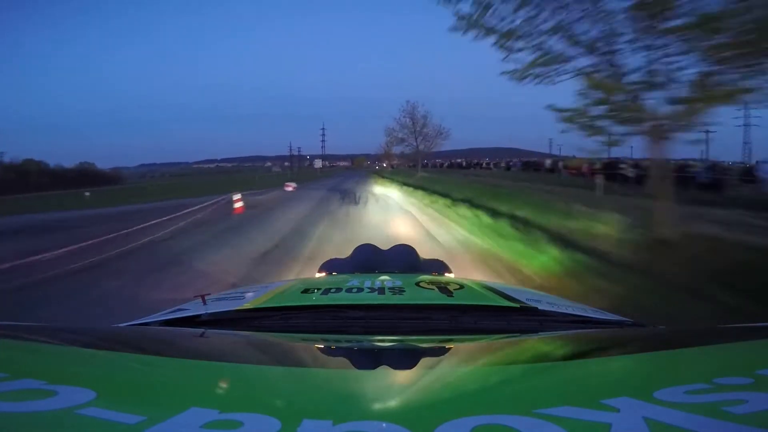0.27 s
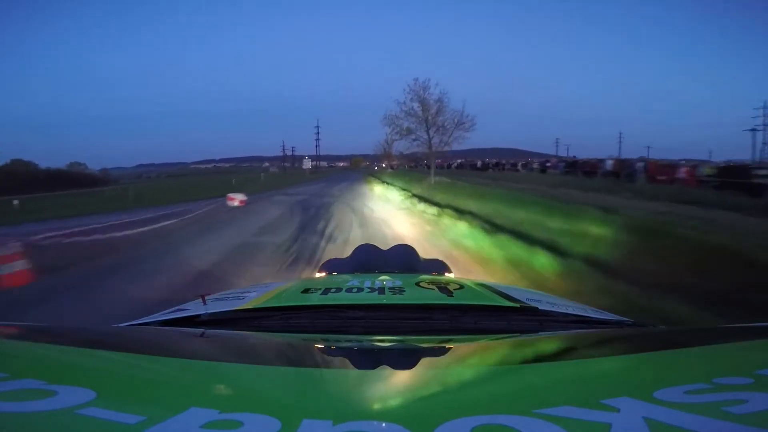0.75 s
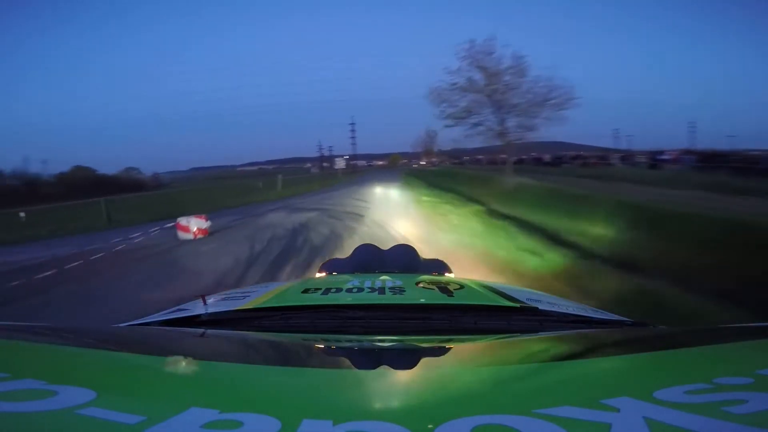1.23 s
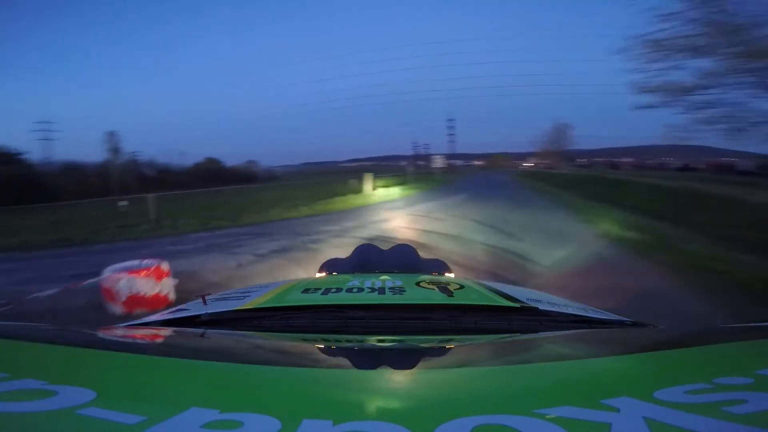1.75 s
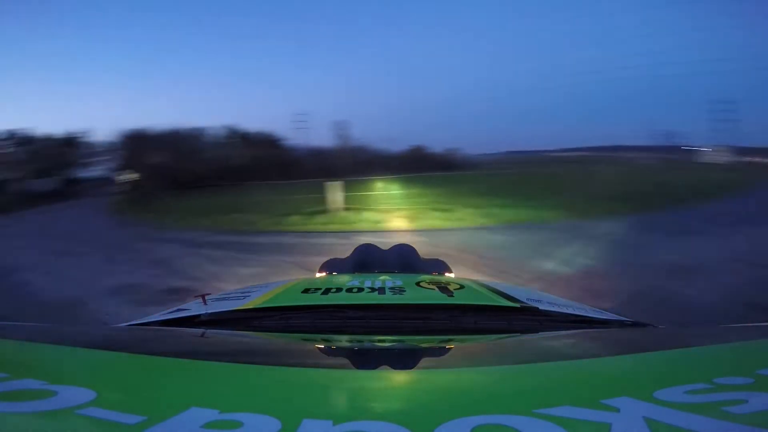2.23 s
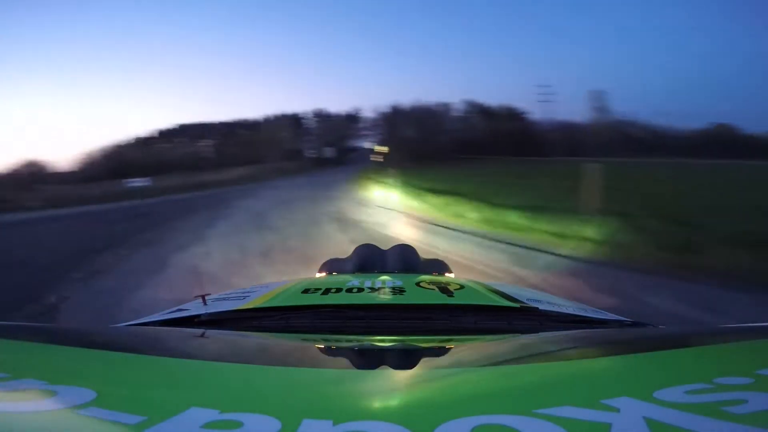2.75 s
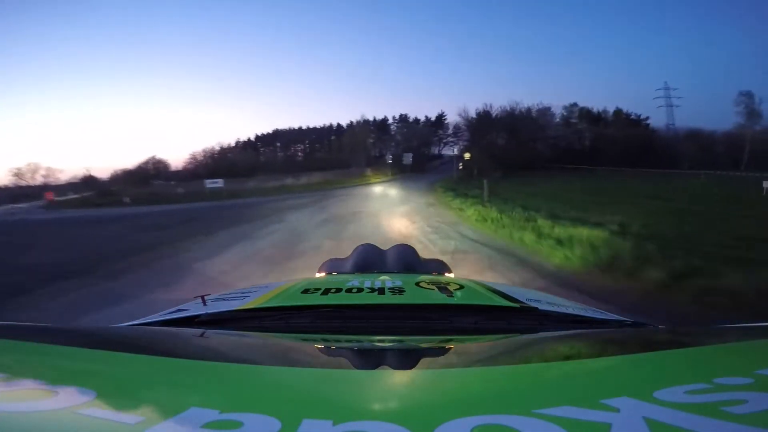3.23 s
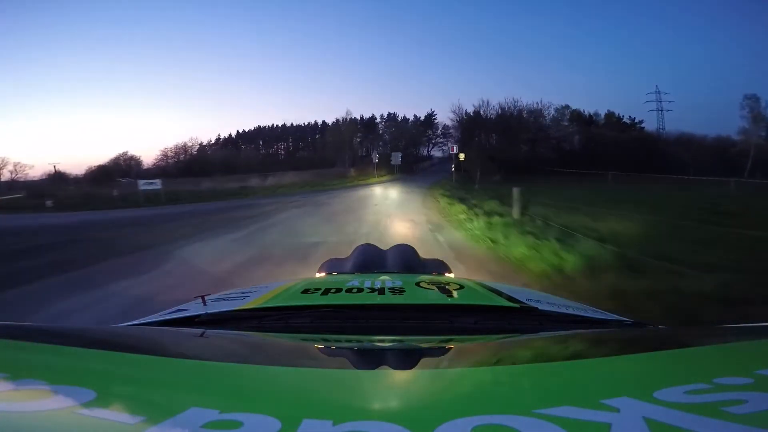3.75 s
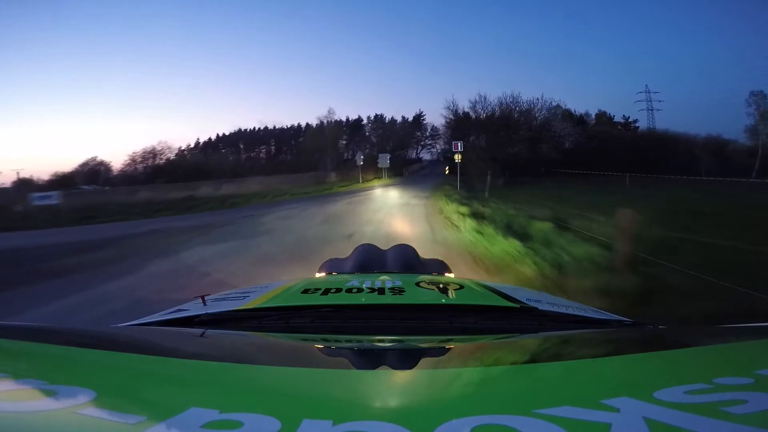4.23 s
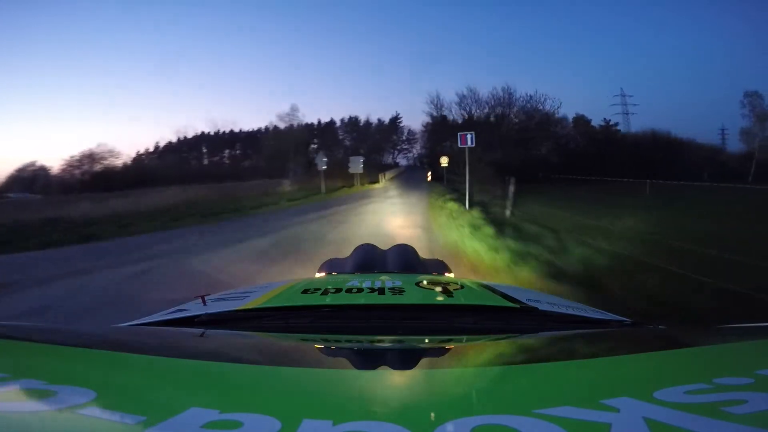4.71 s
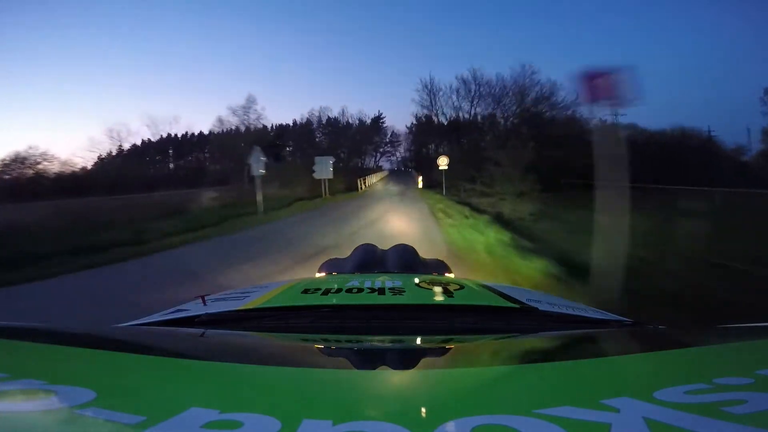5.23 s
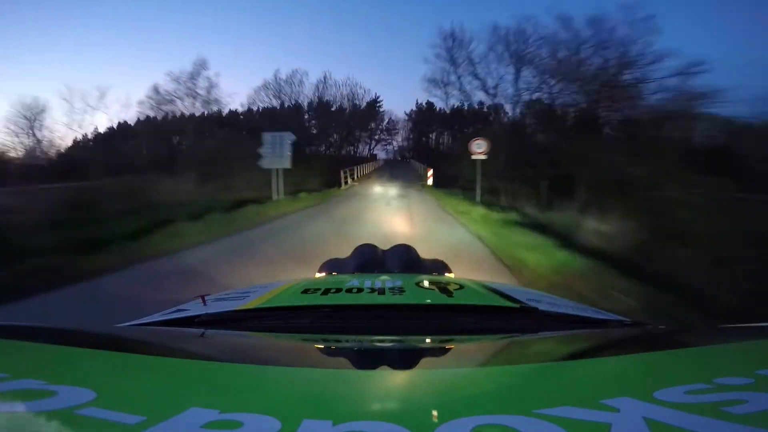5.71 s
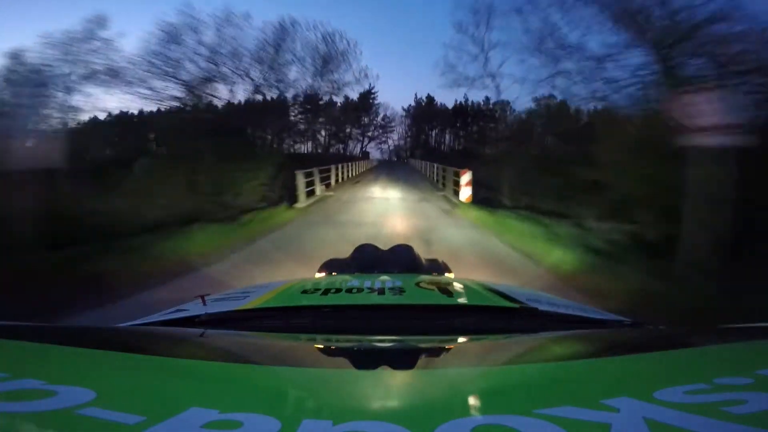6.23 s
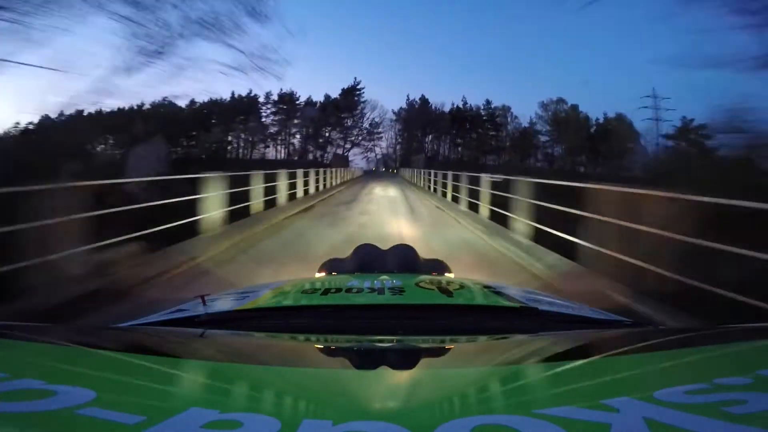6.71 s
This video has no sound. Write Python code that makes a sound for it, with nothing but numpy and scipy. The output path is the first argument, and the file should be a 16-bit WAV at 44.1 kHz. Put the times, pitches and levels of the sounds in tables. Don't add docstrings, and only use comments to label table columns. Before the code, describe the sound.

Rooftop view of a rally car: booming diesel drone sinks through a corner, rattles, climbs again, then the exhaust bangs before the next gear pulls in rushing wind.

```python
import sys
import numpy as np
from scipy import signal
from scipy.fft import rfft, irfft
from scipy.io import wavfile
from scipy.ndimage import uniform_filter1d

SR = 44100
rng = np.random.default_rng(int(sys.argv[2]) if len(sys.argv) > 2 else 0)


def inscribe(sig):
    pcm = np.round(np.clip(np.atleast_2d(sig).T, -1, 1) * 32767)
    wavfile.write(sys.argv[1], SR, pcm.astype(np.int16))


def rack_gain(trim_db):
    fader = np.asarray(trim_db, float)
    return 10 ** (fader / 20)


N = 306936


def evened(x):
    return x / np.sqrt(np.mean(x ** 2) + 1e-20)


def add(mix, start_s, sound):
    part = mix[round(start_s * SR):][:len(sound)]
    part += sound[:len(part)]


def columns(rows):
    s, *cols = np.transpose(rows)
    t = np.arange(s[0], s[-1], 1 / SR)
    return t, [np.interp(t, s, c) for c in cols]


def along(rows):
    s, *cols = np.transpose(rows)
    return [np.interp(np.arange(N) / SR, s, c) for c in cols]


def tent(t, peak_s, rise_s, fall_s):
    return np.interp(t, [peak_s - rise_s, peak_s, peak_s + fall_s], [0, 1, 0])


def tents(t, rows):
    return sum(height * tent(t, s, half_s, half_s) for s, height, half_s in rows)


def puff_db(t, rise_s, fall_s):
    return -20 * np.where(t < 0, -t / rise_s, t / fall_s)


def swells(rows):
    s, db, rise_s, fall_s = np.transpose(rows)[:4, :, None]
    grid = np.arange(0, N + 32, 32)
    power = rack_gain(2 * (db + puff_db(grid / SR - s, rise_s, fall_s))).sum(0)
    return np.interp(np.arange(N), grid, power)


def coloured(x, points):
    f, db = np.transpose(points)
    hz = np.fft.rfftfreq(len(x), 1 / SR)
    curve_db = np.interp(np.log(hz + 1), np.log(f), db, -90, -90)
    return irfft(rfft(x) * rack_gain(curve_db), len(x))


def drift(hz):
    z = rfft(rng.standard_normal(N))
    return evened(irfft(z / (1 + (np.fft.rfftfreq(N, 1 / SR) / hz) ** 4), N))


def ring(x, modes):
    out = np.zeros(len(x))
    for k, (hz, width_hz, db) in enumerate(modes):
        pole = np.exp((2j * np.pi * hz - np.pi * 1.5 * width_hz) / SR)
        rung = signal.lfilter([(1 - abs(pole)) ** 2], np.poly([pole, pole]), x).real
        out += (-1) ** k * rack_gain(db) * rung
    return out


def lowpass(x, edge_hz):
    return signal.sosfilt(signal.butter(2, edge_hz, fs=SR, output="sos"), x)


# time_s, firing_hz, load_db (level of the firing tone)
GEARS = [
    [(0.0, 123.1, -14.5), (0.4, 117.9, -12), (0.77, 103.8, -9), (0.95, 94.89, -15.5), (1.17, 84.1, -16.5),
     (1.57, 74.68, -17), (1.78, 66.5, -12.5), (2.02, 58.07, -17), (2.19, 54.65, -14.5),
     (3.08, 52.33, -18.5), (3.38, 59.02, -19.5), (4.21, 80.53, -14), (4.59, 99.3, -9.5),
     (4.69, 108.8, -9.5), (4.87, 137.7, -29.5), (5.08, 161.4, -23.5), (5.24, 176, -19), (5.7, 163.5, -49)],
    [(6.3, 101.4, -39), (6.43, 107.2, -11.5), (6.53, 114, -19.5), (6.7, 119, -15), (6.959, 128, -16.5)],
]
# peak_s, extra_hz, rise_s, fall_s
FLARES = [
    (2.35, 15, 0.17, 0.13),
    (2.611, 5.5, 0.12, 0.18),
    (2.95, 7, 0.21, 0.091),
]
# peak_s, load_change_db, half_s
SLACKS = [(0.838, -10, 0.064), (0.905, -18, 0.031), (0.989, -19, 0.029), (1.678, -11.5, 0.086),
          (1.812, -16, 0.04), (2.028, -0.5, 0.1), (2.486, 2, 0.017), (4.263, -4.5, 0.067),
          (5.148, -15, 0.037), (6.44, -16, 0.021), (1.3, -1, 0.046), (1.447, -8, 0.058), (2.42, -5, 0.055),
          (2.928, -5, 0.069), (2.62, -4, 0.061)]
OVERTONES = (2, 2.5, 3, 3.5, 4, 5)
# level_db, brightening_db_per_octave of revs
OVERTONE_SHAPE = [(0.5, -1), (-16, 7.5), (-7.5, 4), (-10, 6), (-16, 3.5), (-17, 4.5)]
# freq_hz, gain_db
THROUGH_ROOF = [(100, 4), (115, -2), (135, -11), (150, -24), (174, -13.5), (195, -29.5), (240, -35),
                (290, -23), (355, -20), (420, -20), (490, -14), (600, -34.5), (900, -21)]
# peak_s, change_db, half_s
BEATS = [(1.8, -12, 0.026), (1.9, -23, 0.027), (2.105, 2, 0.091), (2.158, -26, 0.032), (2.167, 2, 0.04),
         (2.372, -1, 0.03), (2.455, -26, 0.054), (2.51, 7, 0.063), (2.634, -7.5, 0.055), (2.69, 5.5, .04),
         (2.818, 6.5, 0.068), (2.86, -13, 0.024), (2.95, -4, .1), (3.078, 7, .05), (3.132, 0, .05),
         (3.219, 8.5, 0.062), (3.276, 2.5, 0.027), (3.348, 6, 0.072), (3.402, -3, .03)]
# peak_s, change_db, half_s
THIRD_SWELLS = [(2.003, 13, .12), (2.25, -5, .1), (2.5, 9, 0.091), (2.641, 4, .12), (2.87, -3, 0.11),
                (2.96, -7, .06), (3.03, 7, .06), (3.2, 7, .07), (3.382, 9, .1)]


def engine():
    gear_overtone_db = (0.37, -8)
    overtone_db, load_share, rev_db_per_octave = -15.5, 0.31, 3
    sway_depth_db, slip_rad = 5.5, 0.09
    out, firing_hz = np.zeros(N), np.full(N, 112.)
    wobble, flutter = drift(29), drift(8.3)
    for rows, gear_db in zip(GEARS, gear_overtone_db):
        t, (hz, load_db) = columns(rows)
        hz = hz + sum(extra_hz * tent(t, s, rise_s, fall_s) for s, extra_hz, rise_s, fall_s in FLARES)
        over_db = overtone_db + gear_db + load_share * (load_db + 14.5)
        over_db = over_db + rev_db_per_octave * np.log2(hz / 90)
        phase = 2 * np.pi * np.cumsum(hz) / SR
        uneven = flutter[round(t[0] * SR):][:len(t)]
        tone = rack_gain(load_db + tents(t, SLACKS)) * np.sin(phase)
        beat_db, third_db = tents(t, BEATS), tents(t, THIRD_SWELLS)
        for k, (db, bright_db) in zip(OVERTONES, OVERTONE_SHAPE):
            roof_db = np.interp(k * hz, *np.transpose(THROUGH_ROOF)) + bright_db * np.log2(hz / 70)
            sway_db = sway_depth_db * np.tanh(drift(7.8)[:len(t)])
            roof_db += beat_db if k == 2 else sway_db / 2 + third_db * (k == 3)
            level = rack_gain(over_db + db + roof_db + 1.9 * uneven)
            tone += level * np.sin(k * (phase + slip_rad * uneven) + k)
        add(out, t[0], np.sqrt(2) * tone)
        add(firing_hz, t[0], hz - firing_hz[-1])
    return out * rack_gain(0.74 * wobble), np.cumsum(firing_hz) / SR


# time_s, judder_hz, level_db
JUDDER = [(3.45, 126.7, -10), (3.522, 129.8, -38), (3.544, 131.9, -16), (3.614, 137.6, -24),
          (3.646, 140.2, -18), (3.8, 130.7, -20.5), (3.88, 134.2, -17), (4.13, 131.4, -17.5),
          (4.2, 127.6, -16.5), (4.3, 128.7, -22.5), (4.45, 125.8, -16)]


def judder():
    t, (hz, db) = columns(JUDDER)
    phase, out = 2 * np.pi * np.cumsum(hz) / SR, np.zeros(N)
    tone = np.sin(phase) + rack_gain(-19.5) * np.sin(phase * 3 / 2)
    level = rack_gain(db + 2.6 * drift(22)[:len(t)]) * signal.windows.tukey(len(t), .15)
    add(out, t[0], np.sqrt(2) * level * tone)
    return out


# start_s, crack_db, thump_db, thump_hz
BANGS = [(5.286, -24, -28, 102), (5.298, -8, -3, 112.6), (5.323, -6, 4.5, 109.2), (5.349, 5.5, -15, 106),
         (5.363, -8, -19, 100), (5.382, -16, 6.5, 102.4), (5.405, -13.5, -25, 106.1),
         (5.44, -10, -5.5, 102), (5.534, -46, 1, 103.8), (5.751, -9.5, 6.5, 102.8), (5.846, -2, 3, 96.3),
         (5.863, -7, -27, 105), (5.878, -21, -14, 102.3), (5.913, -3.5, 2, 102.4), (5.943, -7.5, -52, 98.6),
         (5.985, -12, -30, 98.7), (5.992, -12.5, 2, 92.4), (6.019, -20, -36, 97.7),
         (6.058, -5, -3.5, 109.7), (6.087, -7.5, -9, 99), (6.123, -11.5, 1, 103.4),
         (6.145, -17, -18, 106.3), (6.169, -21, -13, 97), (6.199, -21, 1.5, 95.4),
         (6.264, -14, -0.5, 101.5), (6.338, -8.5, 2.5, 100.7), (6.398, -15, -0.5, 94),
         (5.37, -12, -28, 102)]
# freq_hz, width_hz, level_db
CRACK_MODES = [(340, 167, 9.5), (600, 220, 7.5), (910, 730, 3), (1900, 120, -35)]
# start_s, level_db
TICKS = [(3.497, -35), (5.349, -18), (5.384, -28), (5.4041, -30), (5.4385, -19), (5.7488, -24),
         (5.8446, -23), (5.8526, -25), (5.88, -21), (5.916, -27), (5.947, -23), (5.989, -22), (6.023, -28),
         (6.06, -19), (6.0902, -17), (6.125, -29), (6.1449, -29), (6.1695, -36), (6.1994, -34), (6.34, -20),
         (6.4014, -35)]


def bangs():
    tick_modes = [(2610, 700, 5.5), (4200, 1200, -20), (7000, 1300, -25), (11000, 1500, -32)]
    tick_db = -0.5
    out, t = np.zeros(N), np.arange(12000) / SR
    noise = rng.standard_normal((len(BANGS), 2, len(t)))
    for (s, crack_db, thump_db, hz), (dull, sharp) in zip(BANGS, noise):
        blow = t * np.exp(-t / 0.00013) / .0001 * (1 + 0.29 * dull)
        echo_s = 0.00398 + 0.00066 * dull[0]
        echo = np.roll(blow, round(echo_s * SR))
        scatter = (0.21 * np.exp(-t / 0.012) + 0.04 * np.exp(-t / 0.017)) * sharp
        crack = ring(blow - .5 * echo + scatter, CRACK_MODES)
        fade = rack_gain(thump_db - 5.5 - 60 * t / 0.25) + rack_gain(crack_db - 60 * t / 0.075)
        thump = -np.sin(2 * np.pi * hz * t) * (1 - np.exp(-t / 0.0052)) * fade
        add(out, s + .001, rack_gain(crack_db - 1.5) * crack / abs(crack).max())
        add(out, s, thump * np.cos(np.pi / 2 * t / t[-1]))
    for (s, db), sharp in zip(TICKS, rng.standard_normal((len(TICKS), len(t)))):
        edge = np.exp(-t / .00004) + .25 * sharp * np.exp(-t / .002)
        tick = ring(edge, tick_modes)
        add(out, s, rack_gain(tick_db + db) * tick / abs(tick).max())
    return lowpass(out, 14000)


def clatter():
    knocks_per_s, level_db = 160, -30.5
    span_s = (5.2, 5.349, 5.501, 5.75, 5.9, 6.451)
    modes = [(420, 250, 1), (800, 500, 0), (1500, 1100, -8.5), (2600, 900, -12.5)]
    chance, size = rng.random(N), np.minimum(rng.exponential(1, N), 4)
    knocks = (chance < knocks_per_s / SR) * rack_gain(7.2 * size)
    decay = np.exp(-np.arange(1500) / SR / 0.0035)
    puffs = signal.oaconvolve(knocks, decay)[:N] * rng.standard_normal(N)
    presence = np.interp(np.arange(N) / SR, span_s, [0, 1, 0, 0, 1, 0])
    return rack_gain(level_db) * presence * evened(ring(puffs, modes))


# peak_s, level_db, rise_s, fall_s, low_panels_db
SHAKES = [(.4, -34.5, 2.6, 0.78, -2.5), (1.11, -31, 0.018, 0.053, -5), (1.16, -30, 0.023, 0.059, -4),
          (1.295, -35.5, 0.13, 0.077, -2.5), (1.353, -26.5, 0.02, 0.052, 0.5),
          (1.511, -28, 0.11, 0.085, -4), (1.545, -30.5, 0.14, 0.026, -1), (1.817, -25, 0.022, 0.032, -7),
          (2.03, -32, 0.2, 0.12, -5.5), (2.4, -26.5, 0.38, 0.051, -12), (2.442, -21.5, 0.012, 0.051, 2.5),
          (2.465, -22, 0.054, 0.095, 4.5), (3.149, -34.5, 0.15, 0.15, -3.5), (3.5, -30.5, 0.003, 0.46, -6),
          (3.72, -31, 0.14, 0.11, -3.5), (3.815, -26.5, 0.017, 0.25, -6), (3.98, -35, 0.17, 0.22, 2.5),
          (3.588, -21.5, 0.093, 0.28, 0.5), (3.873, -19.5, 0.1, 0.18, -2), (4.094, -18, 0.091, 0.094, -4),
          (4.197, -45, 0.4, 0.094, 19.5), (4.419, -31.5, 2.07, 0.51, -1.5), (1.2, -39.5, 0.17, 19, -5.5),
          (6.9, -45, 4.6, 0.59, -0.5), (5.31, -30, 1, 0.46, -7)]
# freq_hz, width_hz, level_db
PANELS_LOW = [(573, 420, -3.5), (718, 350, -6.5), (896, 117, 1), (1049.7, 31, 4.5), (1090, 390, -7)]
PANELS_MIDDLE = [(1379, 81, -0.5), (1612, 140, 0), (1747, 34.4, 2), (1829, 64, 4), (2003, 237, -5),
                 (4910, 260, -26)]
PANELS_HIGH = [(2166, 57, 2.5), (2384, 188, 4.5), (2353, 45, 4.5), (2599, 132, 2), (3147, 190, -3.5),
               (3600, 470, -17), (4386, 190, -13), (6530, 430, -25.5)]
# freq_hz, width_hz, level_db
PLATE = [(926, 640, -9), (1445, 140, -5), (1745, 170, 4.5), (2030, 47, 2.5), (2350, 58, 5.5),
         (2500, 48, -2.5), (2670, 72, -11), (3130, 320, -17.5), (4000, 440, -28.5), (6200, 640, -49)]


def rattle(turns):
    calm_db, calm_share, calm_low_db, calm_high_db, shaken_high_db = -42, 0.39, -8, -17.5, -6
    scrape_s, hold_s, scrape_db, attack_s, release_s = 1.896, .092, -18.5, .003, .035
    calm = rack_gain(2 * (calm_db + calm_share * (along(AIRSPEED)[0] + 41.5)))
    shaken = swells(SHAKES)
    shaken_low = swells([(s, db + low_db, rise_s, fall_s) for s, db, rise_s, fall_s, low_db in SHAKES])
    shaken_high = np.sqrt(shaken * shaken_low) * rack_gain(2 * shaken_high_db)
    cycle = (turns + 0.065 * drift(40)) % 1
    soft = .5 * (cycle > .5) * np.exp(-abs(cycle - .5) / .2)
    knock = .45 + np.exp(-cycle / .2) + soft
    drive = knock * rack_gain(1.2 * drift(70)) * rng.standard_normal((4, N))
    low = np.sqrt(calm * rack_gain(2 * calm_low_db) + shaken_low) * evened(ring(drive[0], PANELS_LOW))
    middle = np.sqrt(calm + shaken) * evened(ring(drive[1], PANELS_MIDDLE))
    high = np.sqrt(calm * rack_gain(2 * calm_high_db) + shaken_high) * evened(ring(drive[2], PANELS_HIGH))
    t = np.arange(N) / SR - scrape_s
    away = np.maximum(-t / attack_s, 0) + np.maximum((t - hold_s) / release_s, 0)
    scrape = rack_gain(scrape_db - 20 * away + 0.74 * drift(55)) * evened(ring(drive[3], PLATE))
    return lowpass(low + middle + high + scrape, 8000)


# peak_s, part_hz, level_db, rise_s, fall_s
RINGS = [(1.109, 675, -31, .004, 0.068), (1.15, 663, -31.5, .005, 0.067), (1.352, 1395, -30, 0.035, 0.039),
         (1.352, 2210, -40, 0.026, .05), (1.51, 774, -34, .06, 0.075), (1.5, 420, -32.5, 0.29, 0.17),
         (1.815, 618, -28.5, .02, .06), (2.454, 1416, -23, .03, 0.09), (2.468, 1830, -22.5, 0.052, .06),
         (2.83, 590, -40.5, .08, .08), (3.15, 1466, -33, 0.081, 0.073), (3.502, 2470, -39, .004, 0.087),
         (3.6, 2445, -31, 0.11, 0.17), (3.869, 1430, -31, .1, 0.17), (3.87, 2301, -24.5, 0.1, 0.091),
         (3.901, 3010, -34, 0.13, 0.065), (3.989, 2410, -36.5, 0.067, 0.2), (4.17, 1050, -27, 0.055, 0.068),
         (4.76, 490, -33, 0.15, 0.16), (2.5, 289, -29.5, 0.049, 0.14), (3.95, 470, -31, .25, 0.33),
         (6.68, 487, -37.5, 0.72, 0.46), (6.59, 800, -38.5, 0.19, .15)]


def rings():
    width_hz = 50
    out, t = np.zeros(N), np.arange(-.25, .35, 1 / SR)
    for (s, hz, db, rise_s, fall_s), noise in zip(RINGS, rng.standard_normal((len(RINGS), len(t)))):
        part = evened(ring(noise, [(hz, width_hz, 0)]))
        add(out, s + t[0], rack_gain(db + puff_db(t, rise_s, fall_s)) * part)
    return out


# time_s, hiss_db
AIRSPEED = [(0.0, -39), (0.37, -35), (0.7, -41), (0.93, -47), (1.38, -52.5), (2.2, -50), (2.38, -42.5),
            (2.66, -50.5), (3.74, -52.5), (4.27, -42.5), (4.46, -42.5), (4.98, -42.5), (5.21, -37.5),
            (5.35, -40.5), (6.3, -43.5), (6.78, -36.5), (6.96, -35.5)]
# peak_s, level_db, rise_s, fall_s
BUMPS = [(0.0, 4, 0.11, 0.023), (0.36, -17.5, 0.66, 0.38), (1.41, -16.5, 0.46, 0.1),
         (1.538, -7, 0.1, 0.079), (1.75, -14.5, 0.088, 0.13), (2.2, -18, 1, 0.31), (2.49, -10, 0.19, 0.14),
         (2.88, -15.5, 0.1, 1), (4.482, -20.5, 0.2, 1), (4.89, -20.5, 0.053, 0.18),
         (5.27, -6.5, 0.077, 0.036), (6.4, -18, 0.31, .12), (6.496, -21, 0.14, 0.033),
         (6.624, -20, .08, 0.053), (3.25, -24.5, 0.33, 0.31), (6.85, -24, 0.15, 0.22)]
# peak_s, level_db, rise_s, fall_s
GUSTS = [(0.0, -23.5, .1, 0.94), (.95, -32.5, 0.04, .9), (1.492, -22.5, 0.05, .07), (1.7, -24, 0.12, .7),
         (2.361, -23, 0.12, 0.23), (2.95, -37, 0.14, 0.97), (3.949, -34, 0.28, .8),
         (4.27, -25.5, 0.23, 0.3), (5.14, -27, .12, 0.24), (5.31, -35, 0.19, .9), (6.96, -23.5, 0.57, .1)]
# peak_s, level_db, rise_s, fall_s
SIDEWIND = [
    (.37, -36.5, 1.2, 0.98),
    (2.299, -38.5, 2, 1),
    (4.15, -38, 0.29, 0.52),
    (5.25, -26, 0.69, 0.88),
    (5.9, -38.5, 0.3, 0.95),
]
# freq_hz, width_hz, level_db
ROOF = [(105, 8.6, 4), (176, 15, -21.5), (133.9, 5.9, -10)]
# freq_hz, density_db_per_hz
BUFFET = [(15, -10), (28, 2), (45, -5), (70, 6.5), (140, -28), (200, -43)]
ROAR = [(110, -57.5), (190, -2), (313, -1), (356, -1), (491, 1), (545, -2.5), (802, -3.5), (935, -24.5),
        (1300, -8), (1690, -18), (2860, -120)]
HISS = [(1290, -8), (2200, 1.5), (2620, 1), (2900, -0.5), (3210, 2), (4110, -0.5), (4710, -5.5),
        (5160, -11), (6050, -9.5), (7000, -25.5), (9100, -39), (15400, -120)]
# freq_hz, width_hz, level_db
HISS_TOP = [(6720, 710, -1.5), (8270, 760, -1.5), (9300, 440, -7), (10270, 700, -4.5), (12300, 1300, -17),
            (14300, 900, -20.5)]
TURBO = [(7000, 900, 0), (12300, 1500, 0), (14200, 900, -7)]


def air():
    skin_db, lull_db, buffet_db = -26, -27, -40
    roar_db, roar_share, roar_shaken_db, roar_most_db = -38.5, 0.19, -0.5, -36
    boost_s, boost_db = (2.1, 2.3, 5.2, 5.45), -72
    spool_s, spool_db = (4.45, 0.28, .3), 7.5
    hiss_db, t = along(AIRSPEED)[0], np.arange(N) / SR
    calm_db = np.where((t > 5.3) & (t < 5.6), lull_db, skin_db)
    drummed = np.sqrt(uniform_filter1d(rack_gain(2 * calm_db), 1500) + swells(BUMPS))
    buffeted = np.sqrt(rack_gain(2 * buffet_db) + swells(GUSTS))
    shaken = np.minimum(rack_gain(2 * roar_shaken_db) * swells(SHAKES), rack_gain(2 * roar_most_db))
    steady = rack_gain(2 * (roar_db + roar_share * (hiss_db + 45.0)))
    roaring = np.sqrt(steady + shaken + swells(SIDEWIND))
    a, b, c, d, e = rng.standard_normal((5, N))
    gust = drift(14.0)
    skin = evened(ring(a, ROOF))
    swing = uniform_filter1d(skin ** 2, 1300) + 0.057
    boom = np.minimum(drummed, rack_gain(-13)) * evened(skin / swing ** .25)
    buffet = buffeted * rack_gain(3 * drift(6)) * evened(coloured(b, BUFFET))
    roar = roaring * rack_gain(0.98 * gust + 1.0 * drift(34)) * evened(coloured(c, ROAR))
    hiss = rack_gain(hiss_db + 0.51 * gust + 1.98 * drift(37)) * evened(coloured(d, HISS))
    top_db = hiss_db + spool_db * tent(t, *spool_s) - 18.5 + 0.58 * gust + 1.7 * drift(80)
    top = rack_gain(top_db) * evened(ring(e, HISS_TOP))
    turbo_db = boost_db + 0.4 * (hiss_db + 52.5) + 1.5 * drift(30)
    turbo = np.interp(t, boost_s, [0, 1, 1, 0]) * rack_gain(turbo_db) * evened(ring(b, TURBO))
    return boom + buffet + roar + hiss + top + turbo


# time_s, pitch_hz, level_db
WHINE = [(0, 1800, -52), (1.05, 1780, -47), (1.5, 1740, -45), (2.3, 1730, -36), (2.7, 1740, -42),
         (3.3, 1800, -49.5), (3.6, 1860, -29), (4.1, 1860, -42), (4.6, 1830, -40), (5.2, 1830, -45.5),
         (6.3, 1850, -53.5), (6.96, 1900, -37.5)]


def whine():
    width_hz, waver_hz = 61, 24.85
    hz, db = along(WHINE)
    phase = 2 * np.pi * np.cumsum(hz + waver_hz * drift(5.45)) / SR
    fuzz = drift(width_hz / 2) * np.cos(phase) + drift(width_hz / 2) * np.sin(phase)
    return rack_gain(db + 1.2 * drift(17)) * fuzz


def scene():
    tone, turns = engine()
    car = tone + judder() + bangs() + clatter() + rattle(turns) + rings()
    return (car + air() + whine())[None]


def band_limit(x):
    return signal.sosfilt(signal.butter(12, 15150, fs=SR, output="sos"), x)


def record(dry):
    limited = dry / (1 + abs(dry) ** 8) ** (1 / 8)
    return band_limit(limited)


dry = scene()
out = record(dry)
inscribe(out)
```